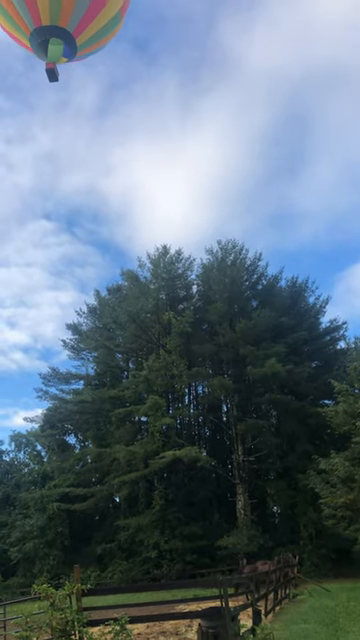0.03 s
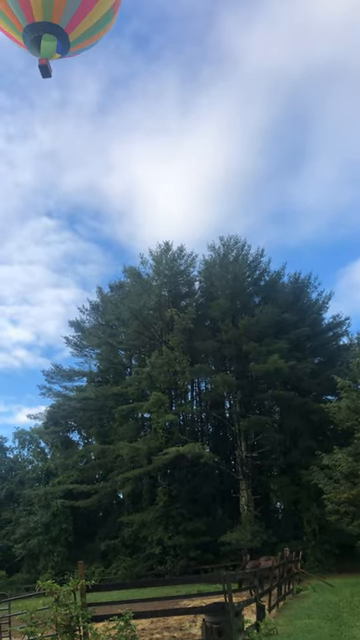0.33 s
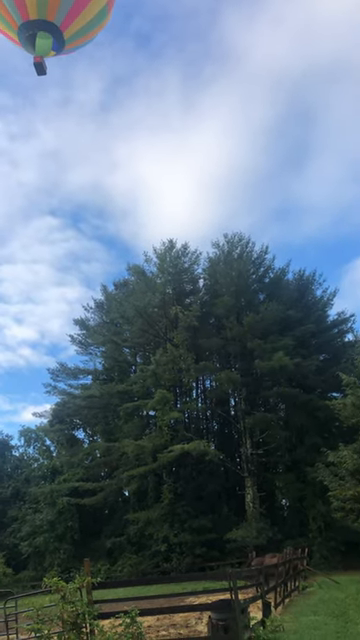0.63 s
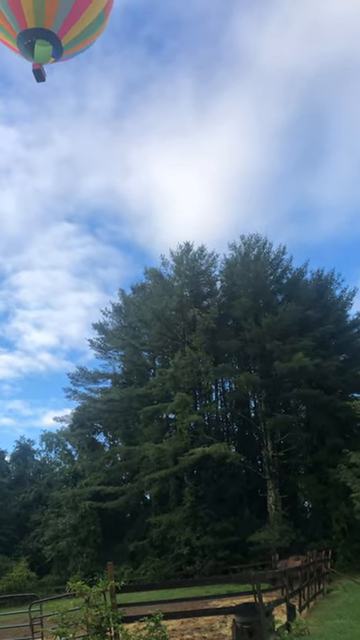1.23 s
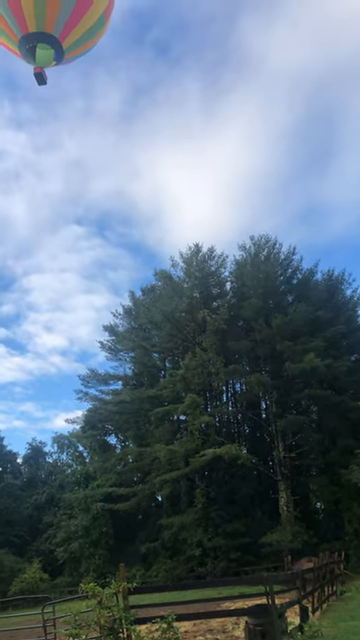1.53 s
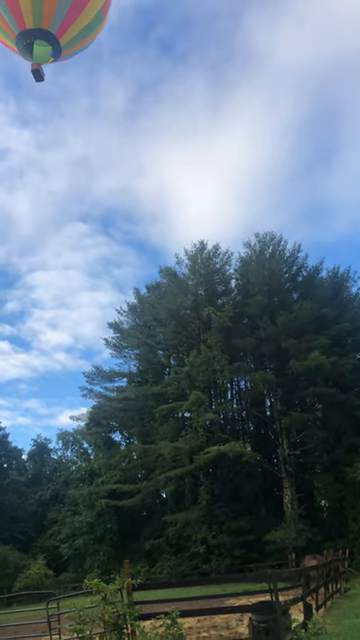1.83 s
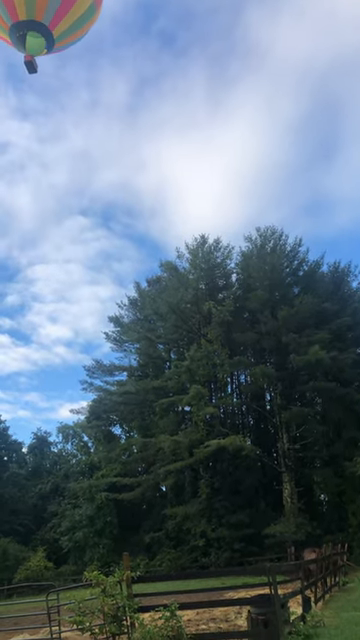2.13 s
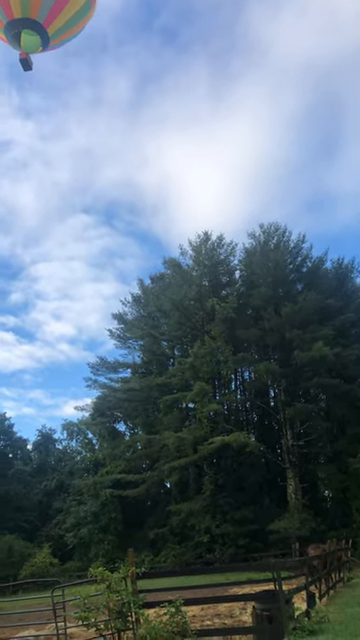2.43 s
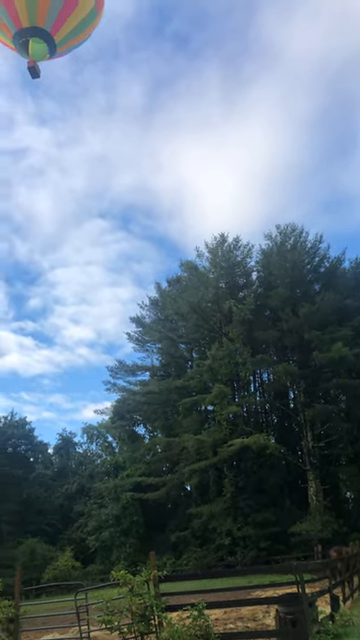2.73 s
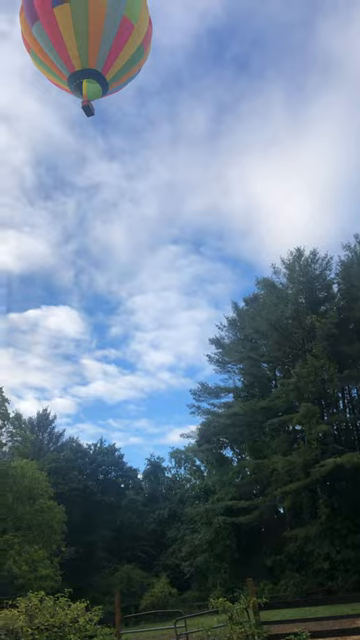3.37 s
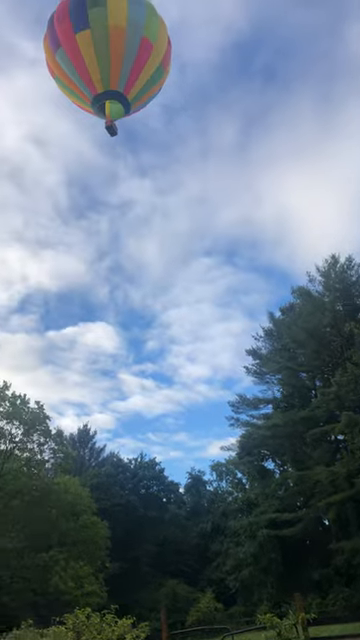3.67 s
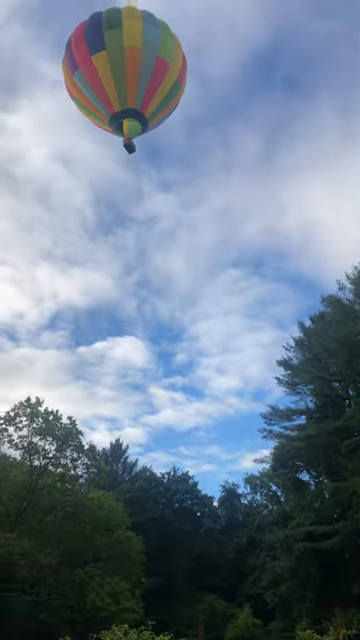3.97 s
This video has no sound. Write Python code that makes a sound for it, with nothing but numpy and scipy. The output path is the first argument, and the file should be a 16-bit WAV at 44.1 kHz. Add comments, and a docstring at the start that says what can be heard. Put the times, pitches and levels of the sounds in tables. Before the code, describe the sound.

Two hoarse, echoing barks from a big dog across a quiet farmyard.

```python
"""A big dog, some way off across a farmyard: a hoarse bark, a closed-mouth gruff, a second bark.
Each bark opens from a low 'w' to a rough 'ow' as vocal pulses and rasping air pass the opening jaw,
then comes back to the microphone from the buildings and dies away in the tree line.
A farther dog yips twice. Insects hiss steadily over a faint low rumble and hum,
with a few far-off knocks and rustles."""
import sys
import numpy as np
from scipy import signal
from scipy.fft import rfft, irfft, next_fast_len
from scipy.io import wavfile
from scipy.ndimage import map_coordinates

SR = 44100
rng = np.random.default_rng(int(sys.argv[2]) if len(sys.argv) > 2 else 0)


def put_to_file(sound):
    """Save the sound as 16-bit audio at rate SR, in the file named by the first command-line argument."""
    columns = np.atleast_2d(sound).T  # one column per channel
    safe = np.clip(columns, -1, 1)
    whole_steps = np.round(safe * 32767)
    wavfile.write(sys.argv[1], SR, whole_steps.astype(np.int16))


N = 176400
TIME = np.arange(N) / SR
TOP_HZ = 15700


def undb(db):
    return 10 ** (np.asarray(db) / 20)


def unit(x):
    return x / np.sqrt(np.mean(x ** 2) + 1e-18)


def colour(x, points):
    """Causal filter with the gain of (Hz, dB) points."""
    hz, db = np.array(points, float).T
    size = next_fast_len(2 * len(x))
    freqs = np.maximum(np.arange(size // 2 + 1) * SR / size, 1)
    cepstrum = irfft(np.log(undb(np.interp(np.log(freqs), np.log(hz), db))), size)
    cepstrum[1:size // 2] *= 2
    cepstrum[size // 2 + 1:] = 0
    return irfft(rfft(x, size) * np.exp(rfft(cepstrum)), size)[:len(x)]


def walk(rate_hz, size=N):
    """Smooth random motion of spread 1."""
    at = np.arange(size) * rate_hz / SR
    return unit(map_coordinates(rng.standard_normal(4096), [at + 2], order=3, mode="wrap"))


def noise(points):
    return unit(colour(rng.standard_normal(N), points))


def burst(envelope):
    """Shaped noise of unit energy: a dense cluster of reflections."""
    return unit(envelope * rng.standard_normal(N)) / np.sqrt(N)


def curve(points):
    """Gain from (s, dB) points."""
    return undb(np.interp(TIME, *np.array(points, float).T))


def add(out, x, start):
    i = int(start * SR)
    out[i:i + len(x)] += x[:N - i]


# The air around the microphone. Each row: frequency in Hz, gain in dB.
AIR_COLOUR = [(15, -44.5), (25, -33), (49, -4), (71, 2), (103, -7), (135, -2), (207, -3.5), (257, -6.5),
              (318, -12), (769, -10), (856, -11), (952, -14), (1390, -21), (3830, -29), (5010, -28),
              (6900, -35), (15000, -40)]

def open_air(db=-65.5):
    """The bed of the yard: low, gently wavering noise."""
    return undb(db) * noise(AIR_COLOUR) * undb(.5 * walk(4.87))


# The insects' band. Each row: frequency in Hz, gain in dB.
INSECT_COLOUR = [(3800, -44), (4400, -13), (4900, 1), (5600, 0.5), (6000, -14.5), (6600, -16), (7500, -34)]

def insects(db=-78.5, flutter_db=0.5):
    """A chorus merged into one steady high hiss."""
    return undb(db) * noise(INSECT_COLOUR) * undb(flutter_db * walk(70))


# The rumble's swell and fade. Each row: time in seconds, level in dB.
RUMBLE_LEVELS = [(0, -68), (.15, -67.5), (.28, -62), (.85, -64), (.95, -69.5), (1.2, -67), (1.5, -76.5),
                 (4, -91.5)]

def rumble(hz=61, wander_hz=4.1):
    """A faint, narrow rumble, unsteady in pitch and level."""
    phase = 2 * np.pi * np.cumsum(hz + wander_hz * walk(25)) / SR
    return curve(RUMBLE_LEVELS) * unit(np.sin(phase) * undb(2 * walk(18)))


def hum(hz=129.2, db=-74):
    """One faint, wavering tone."""
    phase = 2 * np.pi * hz * TIME + 1.2 * walk(6)
    return undb(db) * unit(np.sin(phase) * undb(2 * walk(5.1)))


# The rustle's swells. Each row: time in seconds, level in dB.
RUSTLE_LEVELS = [(0, -102), (.35, -67.5), (.45, -76), (.55, -69), (.68, -81), (.8, -73), (.92, -74.5),
                 (1.25, -70), (1.4, -95)]
# Its tone at a distance. Each row: frequency in Hz, gain in dB.
RUSTLE_COLOUR = [(120, -28), (250, 10.5), (350, -1), (850, -6.5), (1300, -4.5), (1900, -0.5), (2200, -19),
                 (6000, -36.5)]

def rustle():
    """Dull noise stirs a few times, far from the microphone."""
    return curve(RUSTLE_LEVELS) * noise(RUSTLE_COLOUR)


# Far-off knocks. Each row: start in seconds, level in dB, resonance in Hz.
KNOCKS = [(.34, -69, 640), (.53, -68, 860), (.78, -68, 890), (1.02, -64, 480), (1.12, -61.5, 480),
          (1.55, -62.5, 850), (1.73, -64, 590)]

def knock(db, hz, q=10.3, attack_s=0.0076, decay_s=0.033, size=13230):
    """A soft distant knock, smeared around one broad resonance."""
    t = TIME[:size]
    ring = signal.lfilter(*signal.iirpeak(hz, q, fs=SR), rng.standard_normal(size))
    return undb(db) * unit(ring) * np.minimum(t / attack_s, 1) * np.exp(-t / decay_s)


# The farther dog. Each row: start in seconds, pitch in Hz, level in dB.
YIPS = [(.99, 752.4, -57.5), (3.59, 766, -57.5)]
# Its harmonics, fundamental first. Each entry: level in dB.
YIP_HARMONICS = [0, -5, -33]

def yip(hz, db, length_s=.08, jitter=0.029):
    """A short, nearly pure call that arches in pitch and level."""
    arch = np.sin(np.linspace(0, np.pi, int(length_s * SR)))
    pitch = hz * (1 + 0.093 * (arch - .75) + jitter * walk(200, len(arch)))
    phase = 2 * np.pi * np.cumsum(pitch) / SR
    tone = sum(undb(level) * np.sin(k * phase) for k, level in enumerate(YIP_HARMONICS, 1))
    return undb(db) * arch * unit(tone)


# Reverberation among the far trees. Each row: frequency in Hz, gain in dB.
FAR_COLOUR = [(750, 1.5), (1500, -11), (4000, -25)]

def far_trees(x, t60_s=1.0, wet_db=3.5):
    """A distant sound reaches the microphone mostly as dull reverberation."""
    tail = colour(burst(np.exp(-np.log(1000) * TIME / t60_s)), FAR_COLOUR)
    return x + undb(wet_db) * signal.fftconvolve(x, tail)[:N]


# Echoes off buildings and trees. Each row: delay in seconds, spread in seconds, level in dB.
ECHOES = [(.008, 0.028, -3.5), (.09, 0.039, -12), (0.261, .08, -24.5), (.47, .04, -27.5)]
# The tone of the echoes and tail. Each row: frequency in Hz, gain in dB.
YARD_COLOUR = [(200, -3.5), (500, 3), (950, -2), (1400, 0.5), (2500, 0.5), (4500, 3.5), (8000, -18.5)]

def farmyard(x, tail_db=-11.5, build_s=0.043, t60_s=1.59):
    """Sound crosses the yard directly, then as scattered echoes and the long tail of the trees."""
    tail_shape = (1 - np.exp(-TIME / build_s)) * np.exp(-np.log(1000) * TIME / t60_s)
    response = undb(tail_db) * burst(tail_shape)
    for delay, spread, db in ECHOES:
        response += undb(db) * burst((TIME > delay) * np.exp(-np.abs(TIME - delay) / spread))
    return x + signal.fftconvolve(x, colour(response, YARD_COLOUR))[:N]


UNEVEN_HZ = 260.8  # how fast the big dog's pitch and level wobble

def vocal_folds(phase, hz, opening, alternation_db=-3.5, shimmer=0.14):
    """Pulses that turn hoarse in an open bark: strong and weak cycles alternate, the level shakes."""
    pulses = sum(np.cos(k * phase) for k in range(1, int(TOP_HZ / hz)))
    strong_weak = 1 + opening * undb(alternation_db) * np.cos(phase / 2)
    return unit(pulses * strong_weak) * (1 + opening * shimmer * walk(UNEVEN_HZ, len(phase)))


def rasp(phase, effort, onset_share=0.9):
    """Rushing air, pulsing with the voice and growing a little with effort."""
    size = len(phase)
    air = rng.standard_normal(size) * (1 + 0.21 * np.cos(phase)) * (1 + 0.11 * walk(130, size))
    return unit(air) * (onset_share + (1 - onset_share) * effort)


# The big dog's throat, mouth shut and mouth open. Each row: frequency in Hz, gain in dB.
MOUTH_SHUT = [(60, -72.5), (150, -45.5), (290, -27.5), (400, -9.5), (510, -6), (600, -7.5), (690, -10),
              (780, -16), (900, -18.5), (1000, -27.5), (1300, -28), (1800, -38.5), (3000, -58),
              (8000, -74.5)]
MOUTH_OPEN = [(60, -72.5), (150, -42.5), (300, -25), (420, -14), (520, 3), (620, -5.5), (700, -8), (810, 5),
              (890, 0), (1000, -3.5), (1210, -19), (1380, -10.5), (1600, -25.5), (1790, -22.5),
              (2000, -34.5), (2500, -32.5), (3100, -51.5), (3700, -39.5), (4500, -46), (5600, -38),
              (6200, -49.5), (6850, -39), (8200, -56.5), (11000, -74)]

def throat(source, opening, since_release, delay_s=0.0098, open_s=0.07, shut_s=0.12):
    """The jaw opens just after the voice starts, turning 'w' into 'ow', then eases shut."""
    travel = np.clip((TIME[:len(source)] - delay_s) / open_s, 0, 1)
    mouth = opening * np.sin(np.pi / 2 * travel) ** 2 * np.exp(-since_release / shut_s)
    return (1 - mouth) * unit(colour(source, MOUTH_SHUT)) + mouth * unit(colour(source, MOUTH_OPEN))


def chest(size, hz=518.6, jitter=0.017):
    """The lowest resonance sings through the bark."""
    return np.sin(2 * np.pi * np.cumsum(hz * (1 + jitter * walk(UNEVEN_HZ, size))) / SR)


ATTACK_S, HOLD_S, RELEASE_S = 0.017, 0.036, 0.018
OPEN_SWELL_DB, SHUT_SWELL_DB = 9.5, 16.5  # rise from onset to full effort
# The big dog across the yard. Each row: start in seconds, time to full effort in seconds,
# pitch in Hz, onset pitch as a ratio, level in dB, mouth opening from 0 to 1, rasp in dB,
# jitter as a share of the pitch, chest resonance in dB.
BARKS = [(2.291, 0.094, 450.1, 1.08, -33, .97, 4.5, 0.019, -20),
         (3.340, 0.09, 231, .8, -43.5, 0, -1, 0.017, -20),
         (3.629, 0.0879, 468, 1.05, -32, 0.92, 5, 0.0482, -4.5)]

def bark(rise_s, hz, onset_ratio, db, opening, rasp_db, jitter, chest_db, sag_per_s=0.35, size=13230):
    """Uneven pulses and rasping air swell through the throat; the pitch settles, then sags."""
    t = TIME[:size]
    effort = np.minimum(t / rise_s, 1)
    since_release = np.maximum(t - rise_s - HOLD_S, 0)
    glide = 1 + (onset_ratio - 1) * (1 - effort) ** 1.746 - sag_per_s * np.maximum(t - rise_s, 0)
    phase = 2 * np.pi * np.cumsum(hz * (glide + jitter * walk(UNEVEN_HZ, size))) / SR
    source = vocal_folds(phase, hz, opening) + undb(rasp_db) * rasp(phase, effort)
    voice = throat(source, opening, since_release) + undb(chest_db) * effort * chest(size)
    swell_db = opening * OPEN_SWELL_DB + (1 - opening) * SHUT_SWELL_DB
    envelope = np.minimum(t / ATTACK_S, 1) * np.exp(-since_release / RELEASE_S)
    return undb(db + swell_db * (effort - 1)) * envelope * voice


def scene():
    """The farm from one microphone position: the big dog some way off, yips and knocks beyond."""
    dog, far = np.zeros(N), np.zeros(N)
    for start, *row in BARKS:
        add(dog, bark(*row), start)
    for start, *row in YIPS:
        add(far, yip(*row), start)
    for start, *row in KNOCKS:
        add(far, knock(*row), start)
    return (farmyard(dog) + far_trees(far) + open_air() + insects() + rumble() + hum() + rustle())[None]


def record(dry):
    """The phone at the microphone position cuts the top treble."""
    return signal.sosfilt(signal.ellip(10, .2, 70, TOP_HZ, fs=SR, output="sos"), dry)


dry = scene()
out = record(dry)
put_to_file(out)
```